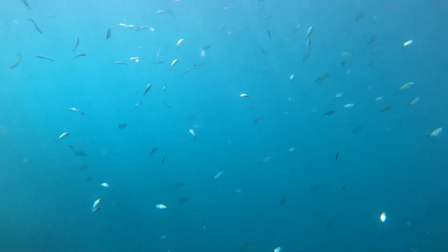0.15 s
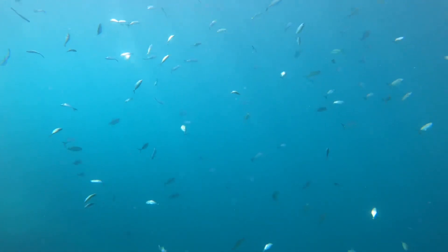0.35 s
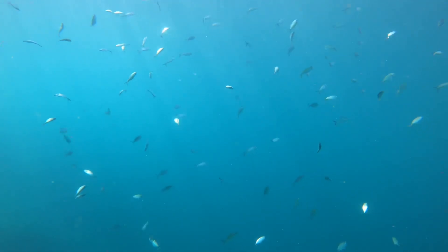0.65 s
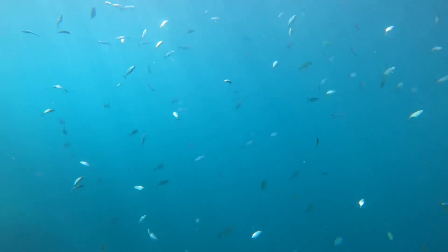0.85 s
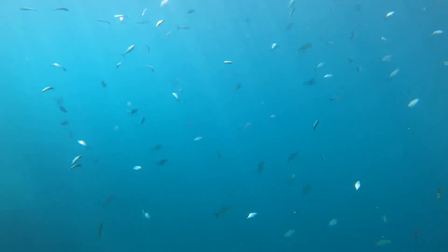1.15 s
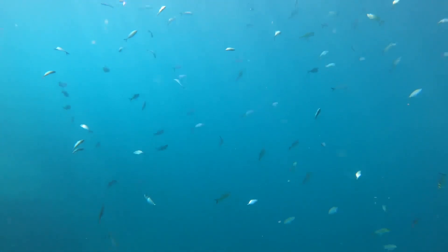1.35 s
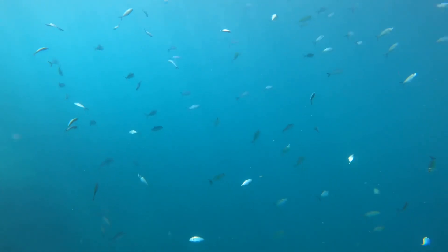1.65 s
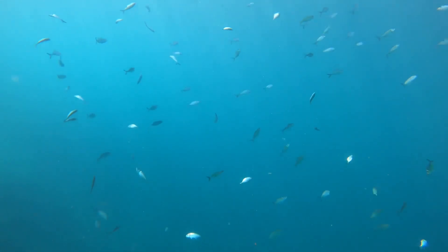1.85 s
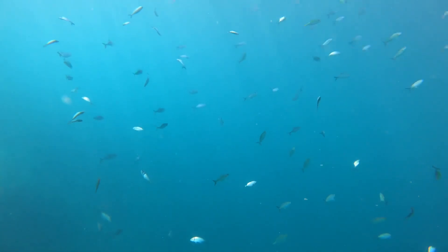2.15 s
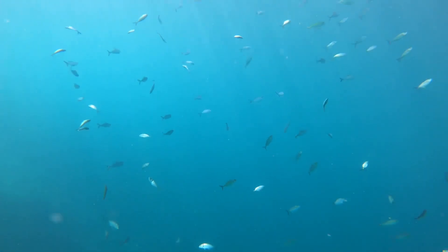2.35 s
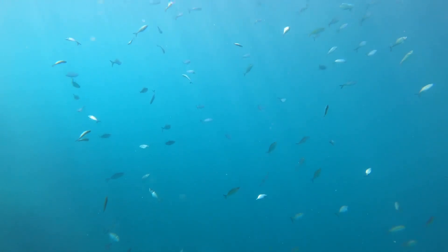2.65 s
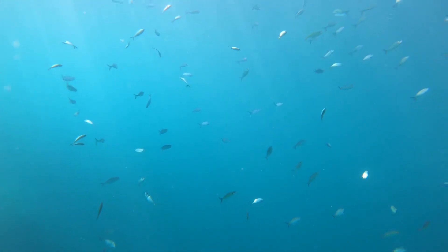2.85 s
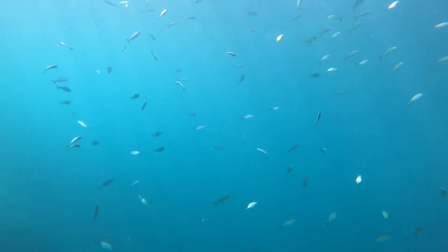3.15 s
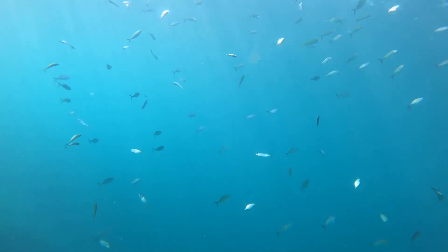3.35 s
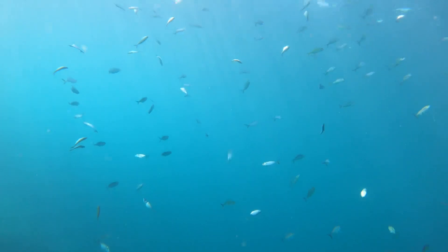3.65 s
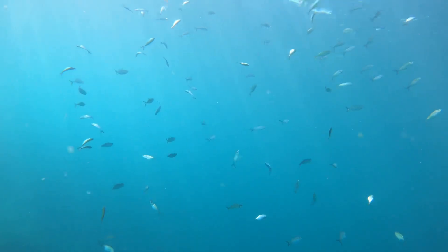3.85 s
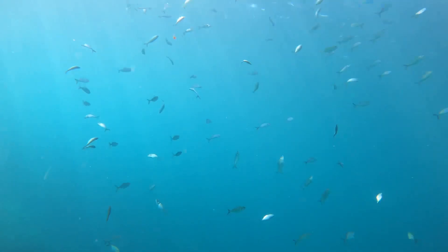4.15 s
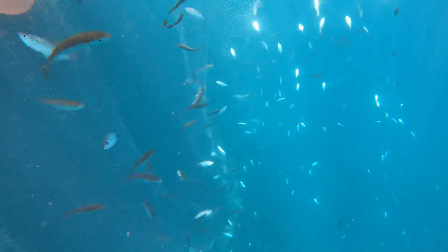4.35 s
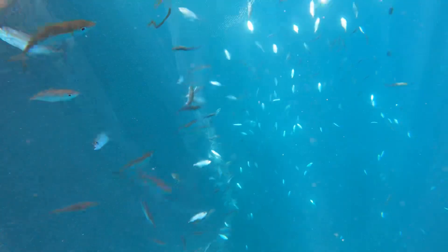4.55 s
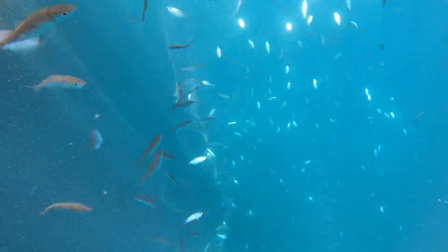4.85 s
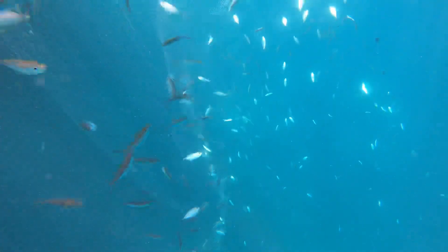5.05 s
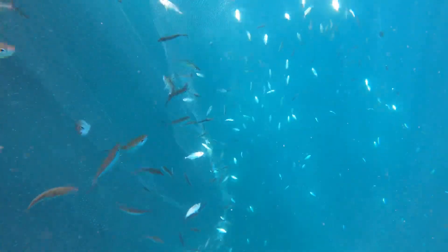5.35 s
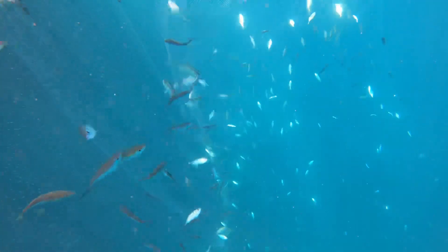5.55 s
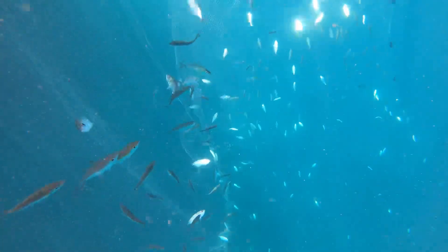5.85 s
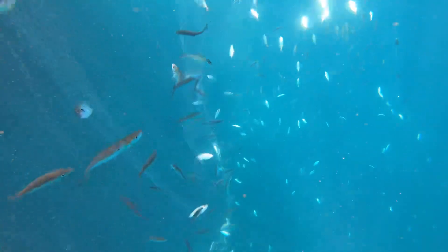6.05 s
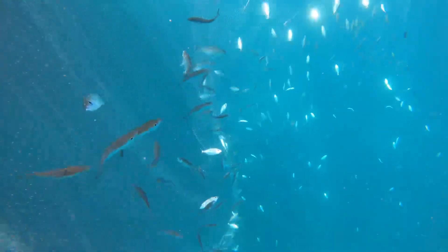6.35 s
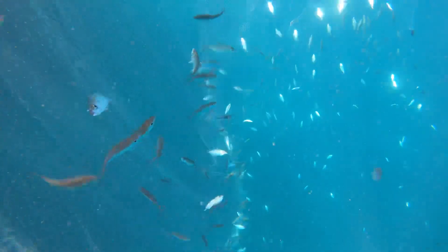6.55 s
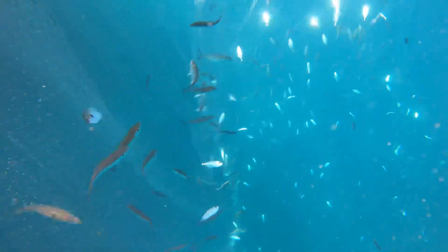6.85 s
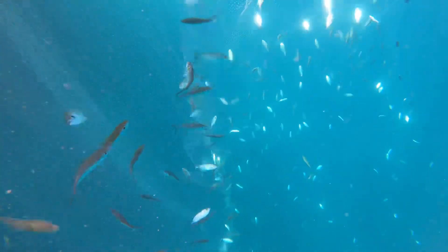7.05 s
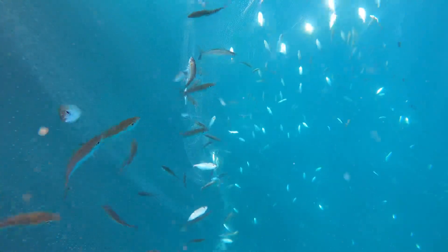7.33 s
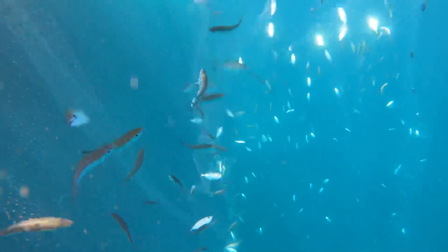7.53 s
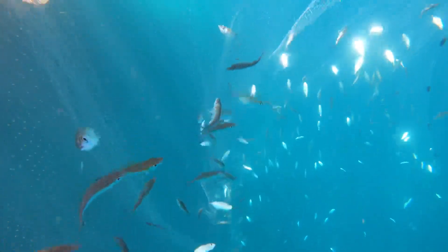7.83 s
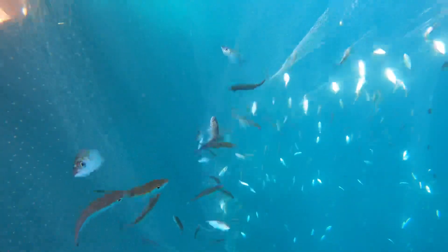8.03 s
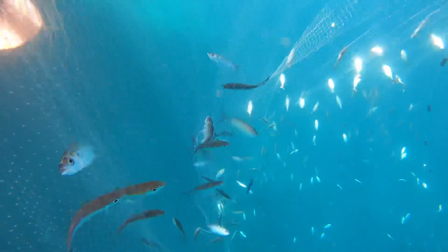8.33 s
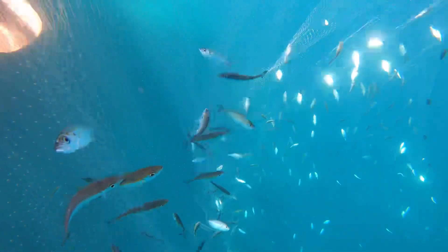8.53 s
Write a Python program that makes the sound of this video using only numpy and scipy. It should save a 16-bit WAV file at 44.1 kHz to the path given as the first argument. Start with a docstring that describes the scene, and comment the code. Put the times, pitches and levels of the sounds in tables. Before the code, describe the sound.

Heard from inside a sealed camera housing underwater, water bumps and sloshes in irregular hollow thuds over a deep rumble, a faint hiss and a boat engine's quiet hum. Sharp ticks, occasional rising bubble notes and short splashes and rubs dot the sound. After a quick dip midway, the thuds grow louder, the engine weakens, and two very faint breathy whistles waver in the hiss as the sound spreads wider.

```python
"""Moving water jostles and thuds against a sealed camera housing, which rings with its own hollow tones.
The camera drifts under water near a boat, in two shots joined by a quick fade. Behind the thuds are
a deep surge, the low hum of the engine, a faint hiss and, in the second shot, two faint whistles.
Bubbles ring as short rising notes; scrapes, splashes and dry clicks make the housing's thin shell ring.
In the second shot the camera turns, so left and right begin to sound different."""
import sys
import numpy as np
from scipy import signal
from scipy.fft import rfft, irfft
from scipy.io import wavfile
from scipy.ndimage import uniform_filter1d

SR = 44100
rng = np.random.default_rng(int(sys.argv[2]) if len(sys.argv) > 2 else 0)


def store_pcm(level_fs):
    """Save levels as 16-bit WAV."""
    pcm = np.round(np.clip(level_fs, -1, 1) * 32767).astype(np.int16)
    wavfile.write(sys.argv[1], SR, np.atleast_2d(pcm).T)


N = 383229
T = np.arange(N) / SR
CUT_S = 4.19  # where the two shots meet


def amp(db):
    """Turn decibels into a number to multiply by."""
    return 10 ** (np.asarray(db) / 20)


def unit_level(x):
    """Scale a signal so that its average strength (rms) is 1."""
    return x / np.sqrt(np.mean(x ** 2) + 1e-20)


def at_pitch(points, hz):
    """Read between the rows of a (pitch, value) table."""
    pitch, value = np.transpose(points)
    return np.interp(np.log(hz + 1), np.log(pitch + 1), value)


def add(mix, start_s, sound):
    """Mix a sound in at its start time."""
    part = mix[..., round(start_s * SR):][..., :sound.shape[-1]]
    part += sound[..., :part.shape[-1]]


def wander(per_s):
    """A smooth random curve of strength 1 that changes about per_s times a second."""
    span = int(SR / per_s)
    return unit_level(uniform_filter1d(uniform_filter1d(rng.standard_normal(N), span), span))


def resonate(x, hz, widths_hz):
    """Keep the sound near one pitch, which may move; each width filters it once more."""
    spin = np.exp(2j * np.pi * np.cumsum(hz * np.ones(len(x))) / SR)
    x = x / spin
    for width in widths_hz:
        decay = np.exp(-np.pi * width / SR)
        x = signal.lfilter([1 - decay], [1, -decay], x)
    return 2 * (x * spin).real


def narrow_noise(hz, width_hz):
    """Noise gathered around one pitch."""
    return unit_level(resonate(rng.standard_normal(N), hz, (width_hz, width_hz)))


def shaped_noise(spectrum, patchy_db, size):
    """Noise that follows a (pitch, level) table, with random louder and softer patches."""
    frames, hz = 4 * N // size + 5, np.fft.rfftfreq(size, 1 / SR)
    real, imag, patches = rng.standard_normal((frames, len(hz), 3)).T
    patches = unit_level(uniform_filter1d(uniform_filter1d(patches, 8, 0), 8, 1))
    slices = (real + 1j * imag) * amp(at_pitch(spectrum, hz)[:, None] + patchy_db * patches)
    return unit_level(signal.istft(slices, nperseg=size, noverlap=3 * size // 4)[1][:N])


def ring(tones, peak_db, tilt_db, pushes, centre_hz, scatter_db, detune=.04, lumpy_db=0, strike=0):
    """Each push, roughened by noise, rings an object's own tones; tilt_db brightens it, per octave."""
    size = 2 * pushes.shape[1]
    hz = np.fft.rfftfreq(size, 1 / SR)
    response = np.array([amp(db) * (width / (width + 1.3j * (hz - pitch))) ** 2
                         for pitch, width, db in tones])
    # each push gets its own mix of the tones
    colour = amp(scatter_db * (rng.random((len(peak_db), len(tones))) - .5)) @ abs(response)
    low_hz, top_hz = np.min(tones, 0)[0], np.max(tones, 0)[0]
    colour *= amp(tilt_db[:, None] * np.log2(np.clip(hz, low_hz, top_hz) / centre_hz))
    colour /= 1 + (hz / top_hz / 5.3) ** 4  # little rings far above the top tone
    stretch = 1 + detune * (rng.random((len(peak_db), 1)) - .5)
    shifted = np.minimum(np.arange(len(hz)) * stretch, len(hz) - 1).astype(int)
    colour = np.take_along_axis(colour, shifted, 1)
    lumps = uniform_filter1d(rng.standard_normal(colour.shape), 1 + int(600 / hz[1]), 1)  # 600 Hz wide
    colour *= amp(lumpy_db * unit_level(lumps))  # no two blows land on the same spot
    # make the tones ring after the push, not before (a minimum-phase filter)
    cepstrum = irfft(np.log(colour + 1e-9))[:, :size // 2]
    cepstrum[:, 1:] *= 2
    colour = np.exp(rfft(cepstrum, size))
    force = strike + pushes * rng.standard_normal(pushes.shape)
    out = irfft(rfft(force, size) * colour)[:, :3 * size // 4]
    out *= np.minimum(.8 * centre_hz * np.arange(out.shape[1]) / SR, 1) ** 2  # soft start
    return out * (amp(peak_db) / abs(out).max(1))[:, None]


# How far the camera has turned: (time [s], share of the whole turn [0-1])
CAMERA_TURN = [(4.3, 0), (5, 0.1), (6, 0.46), (7, 0.79), (8.69, 1)]
# How much louder the left is after the turn: (pitch [Hz], left minus right [dB])
LEFT_LOUDER = [(100, .3), (350, .8), (600, 2), (1000, 2), (2000, 1), (4000, -.5), (9000, 2.5)]
# How far the left wave runs ahead after the turn: (pitch [Hz], lead [radians])
LEFT_AHEAD = [(200, 0), (600, -.2), (1300, -.3), (2300, -1.3), (3600, -.3), (5000, -1.2)]
# Sound that comes from all round: (pitch [Hz], relative level [dB])
SCATTER = [(60, -27.5), (300, -49), (1000, -8.5), (2000, -13), (4000, 1.5), (12000, -10)]


def microphones(mono):
    """Two microphone openings hear alike until the camera turns; then level and timing differ."""
    hz = np.fft.rfftfreq(2048, 1 / SR)
    ratio = amp(at_pitch(LEFT_LOUDER, hz)) * np.exp(1j * at_pitch(LEFT_AHEAD, hz))
    scatter = amp(at_pitch(SCATTER, hz)) * np.exp(2j * np.pi * rng.random(len(hz)))
    direct, scattered = (signal.oaconvolve(mono, np.roll(irfft(response), 1024)[1:], "same")
                         for response in ((ratio - 1) / (ratio + 1), scatter))
    turned = np.interp(T, *np.transpose(CAMERA_TURN))
    side = turned * (direct + scattered * (.3 + .7 * wander(60)))
    return np.array([mono + side, mono - side])


# How hard the water moves, one list a shot: (time [s], jostle [dB], surge [dB], hiss [dB])
WATER_LEVELS = [
    [(0.06, -38, -30, -58.5), (0.3, -32, -42, -56.5), (0.52, -34, -39, -55), (0.7, -25, -28, -48.5),
     (1.2, -30.5, -39, -50), (1.6, -28.5, -36, -57), (2.1, -30.5, -31, -51), (2.4, -23, -23.5, -47),
     (2.75, -27, -30, -47.5), (3.3, -25, -27, -47.5), (3.6, -23.5, -32.5, -53), (4.13, -23.5, -30, -48.5)],
    [(4.27, -26, -40.5, -55), (4.65, -24.5, -27.5, -50.5), (5.3, -25.5, -34, -52.5), (5.8, -24.5, -31, -49),
     (6.3, -24.5, -30, -49.5), (7.0, -25, -37, -49), (7.4, -27, -38.5, -47), (7.75, -27.5, -24, -52),
     (8.1, -28, -30.5, -48), (8.5, -27, -34.5, -45), (8.69, -25, -25.5, -54.5)],
]


def water_levels():
    """The jostle, surge and hiss levels at every moment, in dB."""
    times, *columns = np.transpose(np.concatenate(WATER_LEVELS))
    return [np.interp(T, times, column) for column in columns]


# The deep sound of moving water: (pitch [Hz], relative level [dB])
SURGE_SPECTRUM = [(8.8, -25), (15, -3.5), (32, 7.5), (49, -2.5), (70, -7.5), (87, -4), (152, -13.5),
                  (260, -22), (340, -35.5), (570, -120)]


def surge(level_db, sway_db=3):
    """Moving water makes a deep rumble that swells and sinks at random."""
    return amp(level_db + sway_db * wander(10)) * shaped_noise(SURGE_SPECTRUM, 0.43, size=4096)


# The notes in the engine's hum: (multiple of the firing rate, level [dB])
ENGINE_NOTES = [(2, -45), (3, -41.5), (5, -51.5)]


def engine(firing_hz=21.18):
    """The boat's engine fires over and over, making a wavering hum that is fainter in the second shot."""
    firings = np.cumsum(firing_hz * (1 + 0.016 * wander(6.6))) / SR
    out = np.zeros(N)
    for multiple, db in ENGINE_NOTES:
        level = amp(db - 5.3 * (T > CUT_S) + 5.2 * wander(40))
        out += np.sqrt(2) * level * np.sin(2 * np.pi * (multiple * firings + rng.random()))
    return out


# The hiss heard through the shell: (pitch [Hz], relative level [dB])
HISS_SPECTRUM = [(900, -45), (1300, -13), (1520, -4.5), (1660, 9), (1830, -8.5), (2100, -14.5), (2450, -18),
                 (2950, -9), (3900, -23.5), (4800, -22.5), (5600, -47.5), (6500, -30.5), (8000, -41.5),
                 (12000, -45), (15000, -78)]


def hiss(level_db):
    """A faint flickering hiss, with an extra, steadier high band in the first shot."""
    flicker = amp(1.5 * wander(25) + 2.5 * wander(150)) * shaped_noise(HISS_SPECTRUM, 2.5, size=512)
    high_band = (T < CUT_S) * amp(-31 + 1.9 * wander(100)) * narrow_noise(5700, 970)
    return amp(level_db) * (flicker + high_band)


# Two whistles in the hiss: (time [s], upper whistle [dB], lower whistle [dB])
WHISTLE_LEVELS = [(4.201, -85.5, -80.5), (5.601, -93.5, -80), (6.498, -97, -78), (8.69, -99.5, -71)]


def whistles(pitches_hz=(6650, 5150), width_hz=700):
    """Two faint, breathy whistles waver in the second shot; the upper one gives way to the lower."""
    times, *levels = np.transpose(WHISTLE_LEVELS)
    out = np.zeros(N)
    for db, hz in zip(levels, pitches_hz):
        out += amp(np.interp(T, times, db) + 3 * wander(20) + 4 * wander(120)) * narrow_noise(hz, width_hz)
    return (T > CUT_S) * out


# Rubs on the shell: (middle time [s], level [dB], half length [s])
SCRAPES = [(0.948, -51, 0.3), (4.307, -39, 0.025), (4.559, -35, 0.017), (4.651, -32.5, 0.0081),
           (4.688, -39, 0.015), (4.734, -33, 0.011), (4.791, -40, 0.0088), (5.049, -40.5, 0.039),
           (5.17, -42.5, 0.079), (5.285, -47, 0.032), (5.8, -38, 0.02), (6.733, -40, 0.019),
           (6.763, -39.5, 0.016), (6.985, -35, 0.012)]


def scrapes():
    """Something rubs the shell and keeps one of its low tones singing for a moment."""
    swell = sum(amp(db) * np.exp(-((T - middle_s) / half_s) ** 4) for middle_s, db, half_s in SCRAPES)
    return swell * amp(1.5 * wander(60)) * narrow_noise(hz=1660, width_hz=210)


# The thin shell's own tones; wider ones die sooner: (pitch [Hz], width [Hz], relative level [dB])
SHELL_TONES = [(1080, 230, -4), (1650, 220, 13), (3064, 580, 17), (3130, 1900, -7), (4637, 1000, 8),
               (6640, 600, -2), (7000, 3000, -30), (9700, 730, -15), (13200, 1400, -28)]
# Fizzy splashes: (middle time [s], peak level [dB], brightness [dB per octave], half length [s])
SPLASHES = [(1.967, -36.5, 1, 0.014), (2.342, -36.5, 5, 0.014), (2.412, -31, 5, 0.024),
            (2.614, -26, -6, 0.014), (3.061, -32, -2, 0.013), (3.291, -36, 3, 0.041),
            (3.359, -41, -1, 0.11), (4.659, -40, -13.5, 0.036), (4.713, -26, -13, 0.046),
            (5.04, -36, -6.5, 0.037), (5.18, -50, -29, 0.1)]


def splashes():
    """Each splash is a dense crackle that swells and fades on the shell."""
    out, t = np.zeros(N), np.arange(-4096, 4096) / SR
    times, db, tilt_db, half_s = np.transpose(SPLASHES)
    crackle = amp(5 * np.minimum(rng.exponential(1, (len(times), len(t) // 64)), 4)).repeat(64, 1)
    pushes = crackle * np.exp(-(t / half_s[:, None]) ** 2)
    sounds = ring(SHELL_TONES, db, tilt_db, pushes, centre_hz=3000, scatter_db=2.9, lumpy_db=2)
    for middle_s, splash in zip(times, sounds):
        add(out, middle_s + t[0], splash)
    return out


# The louder clicks: (time [s], peak level [dB], brightness [dB per octave])
CLICKS = [(0.129, -40, -7), (0.3113, -22.5, -15), (0.147, -46.5, -14), (0.173, -51.5, 2.5),
          (0.2803, -47, -14), (0.3576, -46, 10), (0.4519, -55, 0), (0.589, -39, -9), (0.612, -33, -11),
          (0.657, -34, -10), (0.694, -48, -7), (0.705, -45, 3), (0.807, -34, -13), (0.8774, -55, -11),
          (0.9184, -45, -14), (0.93, -29.5, -9), (1.068, -30, -4), (1.2054, -32, -16), (1.309, -43.5, 4),
          (1.42, -46, 8.5), (1.8368, -43, -5), (1.938, -38, -17), (1.959, -41, -12), (2.197, -43, 2),
          (2.281, -52, 25), (2.2857, -40, -4), (2.3137, -44, -5), (2.336, -29, -11), (2.3835, -45, -2),
          (2.4025, -39, 1), (2.423, -30, -5), (2.4534, -47, 1), (2.4833, -34, -5), (2.5217, -46, -8),
          (2.537, -51, 1), (2.558, -51, 12), (2.585, -44, 0), (2.6025, -22, -18), (2.611, -21, -23),
          (2.8141, -28, -1), (2.839, -42, -1), (2.9, -32.5, 2), (2.9747, -45, 0), (3.053, -28, -9.5),
          (3.064, -29, -7), (3.115, -40.5, 2), (3.1493, -35, 0.5), (3.2291, -50, -6), (3.264, -35.5, 0),
          (3.2915, -33, -11), (3.34, -34.5, -1), (3.364, -28, -9), (3.425, -36, -2), (3.468, -37, -23),
          (3.528, -38, -0.5), (3.66, -39.5, 2.5), (3.705, -44.5, 2), (3.775, -45, 9), (3.8362, -38.5, -9),
          (3.8505, -31, -6), (4.0123, -38, -9), (4.0616, -35, -3), (4.0931, -39, -3), (4.127, -34.5, -5.5),
          (4.26, -29.5, -15), (4.313, -48, 3), (4.4, -39, -4.5), (4.4643, -37, -10), (4.53, -37, 6),
          (4.604, -40, -3), (4.6354, -37, -9), (4.6548, -35, -6), (4.69, -29, -19), (4.6981, -26, -8),
          (4.7337, -33, -10), (4.7686, -43.5, -20), (4.79, -26, -17.5), (4.8377, -44, -12),
          (4.8838, -34, -9.5), (4.962, -40, -5), (5.007, -35, -10.5), (5.043, -42, 4), (5.122, -25, -18.5),
          (5.235, -36, -9), (5.319, -44, 7), (5.5658, -20, 2), (5.581, -38, 6), (5.704, -20.5, 4.5),
          (5.609, -45, 4), (5.7694, -36, -1), (5.7914, -30, 3), (5.8703, -30.5, -11), (5.975, -44, 4),
          (6.019, -34.5, 1), (6.083, -26.5, -10), (6.186, -27, -19), (6.295, -40, -6), (6.349, -15.5, -6.5),
          (6.4473, -27, -16), (6.585, -39, -9), (6.5976, -28, -16), (6.632, -31.5, -1.5),
          (6.7456, -39.5, 3.5), (6.8664, -25.5, -16), (6.89, -39, 3), (6.914, -42, 6), (7.02, -44, -2),
          (7.0635, -37, -10), (7.1811, -42, -4), (7.1932, -29.5, 1), (7.2887, -30, -10.5),
          (7.373, -27.5, -7), (7.3886, -33, -5.5), (7.4545, -41, -13), (7.481, -27.5, -18),
          (7.5917, -41, -15), (7.671, -46, 1), (7.693, -22.5, -4.5), (7.7578, -35, -2.5), (7.832, -43, -5),
          (7.891, -20.5, -6), (8.0756, -38, -2), (8.2013, -35, 1), (8.2422, -41, -11), (8.432, -15, -11.5),
          (8.5011, -40, -14), (8.5245, -38, 2), (8.596, -35.5, -2), (8.6063, -38, 0)]


def clicks(hiss_db, tries_per_s=450, tail_s=0.005, tail_db=-17):
    """Sharp ticks with a crackly tail ring the shell; faint random ones crowd where the hiss is strong."""
    when, size, bright, chance = rng.random((int(tries_per_s * N / SR), 4)).T
    faint = np.c_[when * N / SR, -61 - 6 * np.log(size + .02), 12 * (bright - .9)]
    faint = faint[chance < amp(hiss_db[(when * N).astype(int)] + 36)]
    out, t = np.zeros(N), np.arange(1536) / SR
    snap = np.exp(-((t - .0021) / .0011) ** 2)
    tail = amp(tail_db) * t / tail_s * np.exp(-t / tail_s)
    grit = .25 * np.exp(-((t - .003) / .002) ** 2)  # makes some ticks softer and longer
    for times, db, tilt_db in np.transpose(CLICKS), faint.T:
        pushes = snap + tail + rng.random((len(times), 1)) * grit
        ticks = ring(SHELL_TONES, db, tilt_db, pushes, 3000, scatter_db=12, detune=.06, lumpy_db=2.5)
        for start_s, tick in zip(times, ticks):
            add(out, max(start_s - .0008, 0), tick)
    return out


# The bubbles that stand out: (time [s], level [dB], starting pitch [Hz])
BUBBLES = [(0.127, -5.5, 351), (3.469, -27.5, 2430), (4.689, -23, 3140), (4.7, 0.5, 358),
           (4.916, -26, 2960), (5.085, 1, 273), (5.118, -0.5, 240.5), (6.494, -12, 323), (6.867, -25, 3070),
           (7.288, -27, 2800), (7.254, -32, 2700), (7.56, -31, 3000), (7.589, -28, 2570),
           (7.759, -28.5, 3150), (7.769, -29, 363), (8.074, -29.5, 2580), (8.617, -6, 363)]


def bubbles(hiss_db, tiny_per_s=60, low_hz=2500, top_hz=5200):
    """A bubble swells fast and rings, rising a little in pitch; tiny ones pop at random in the hiss."""
    out = np.zeros(N)
    when, quiet, pitch = rng.random((int(tiny_per_s * N / SR), 3)).T
    tiny_db = hiss_db[(when * N).astype(int)] + 1.5 - 10.5 * quiet
    tiny = np.c_[when * N / SR, tiny_db, low_hz * (top_hz / low_hz) ** pitch ** 3]
    for rows, ring_at_1khz_s in (BUBBLES, .032), (tiny, .016):
        for start_s, db, hz in rows:
            ring_s = ring_at_1khz_s * (hz / 1e3) ** -0.7  # higher bubbles die sooner
            t = np.arange(0, 1.5 * ring_s, 1 / SR)
            swell = (1 - np.exp(-t / (0.099 * ring_s))) * amp(db - 60 * t / max(ring_s, .004))
            add(out, start_s, swell * np.sin(2 * np.pi * hz * t * (1 + 0.46 * t)))
    return out


# The tones of a hard knock: (pitch [Hz], level [dB], time to fade by 60 dB [s])
KNOCK_TONES = [(128, -9, 0.12), (360, -9, 0.045), (650, -7.5, 0.041), (965, -5, 0.026),
               (1525, -15.5, 0.048), (1704, 3.5, 0.012), (2680, -3, 0.0071), (3570, 0.5, 0.0051)]


def knock(start_s=.0155, rise_s=.0007):
    """One hard knock on the housing sets off tones that quickly die away."""
    out, t = np.zeros(N), np.arange(SR // 5) / SR
    tones = sum(amp(db - 60 * t / ring_s) * np.sin(2 * np.pi * hz * t) for hz, db, ring_s in KNOCK_TONES)
    add(out, start_s, (1 - np.exp(-t / rise_s)) ** 2 * tones)
    return out


# The housing's own tones, one list a shot: (pitch [Hz], width [Hz], relative level [dB])
HOUSING_TONES = [
    [(394, 41, 6.5), (577.4, 68, 10), (607, 14, -4.5), (681, 51, -6), (995, 51, -3.5), (1620, 650, -30),
     (289, 2.3, -22.5)],
    [(368.4, 48.6, 2.5), (553, 79.7, -2.5), (311, 52, -12), (710, 23, -17), (940.5, 23.3, -13.5),
     (1640, 147, -29), (168.7, 9.3, -16)],
]


def jostle(level_db, pushes_per_s=1500, soften_hz=2400):
    """Many small, soft, uneven pushes of water keep the housing ringing."""
    tilt_db = -wander(3.2) - 0.86  # the brightness drifts, in dB per octave
    sizes = amp(2 * np.minimum(rng.exponential(1, N), 5)) * (rng.random(N) < pushes_per_s / SR)
    pushes = sizes * rng.choice([-1., 1.], N) * amp(1.6 * wander(48))
    pushes = signal.sosfilt(signal.butter(4, soften_hz, fs=SR, output="sos"), pushes)
    pitch_drift = 1 + .012 * wander(12)
    out = np.zeros(N)
    for tones, shot in zip(HOUSING_TONES, (T < CUT_S, T >= CUT_S)):
        for hz, width, db in tones:
            level = amp(db + tilt_db[shot] * np.log2(hz / 480))
            out[shot] += level * resonate(pushes[shot], hz * pitch_drift[shot], (width, 3.95 * width))
        out[shot] = unit_level(out[shot])
    return amp(level_db) * out


# The loud thuds: (time [s], peak level [dB], brightness [dB per octave])
THUDS = [(0.122, -17.5, 4), (0.62, -16, 0), (0.775, -19, -6), (1.133, -16, 0.5), (1.316, -11.5, -6.5),
         (1.39, -20, 5.5), (1.45, -22, -3), (1.482, -13.5, -1), (1.652, -10.5, -2.5), (1.865, -11.5, -2),
         (2.037, -11.5, -6), (2.238, -12.5, -2), (2.317, -13.5, -13), (2.384, -19, 7), (2.435, -11.5, -6),
         (2.626, -13.5, -1), (2.652, -25.5, -7), (2.923, -15.5, 0), (2.96, -16, -2.5), (3.308, -16.5, 8.5),
         (3.372, -13, 5.5), (3.481, -15.5, -8.5), (3.545, -18.5, 4.5), (3.643, -14.5, -4), (3.668, -20, -2),
         (3.753, -15, 0), (3.961, -11.5, -7.5), (4.306, -7.5, 7.5), (4.366, -6.5, 1), (4.401, -12.5, -3.5),
         (4.533, -14, 10.5), (4.561, -7.5, 2.5), (4.713, -15, 4), (4.769, -7.5, -2), (4.837, -8.5, -5.5),
         (4.99, -14, -4), (5.052, -8.5, -7), (5.361, -13, 2.5), (5.474, -16, 5), (5.516, -7.5, 3),
         (5.55, -12, -5), (5.69, -11, 2.5), (5.777, -14.5, -9.5), (5.864, -9.5, 3), (5.899, -12, -4.5),
         (5.917, -10, -0.5), (5.982, -18, 0.5), (6.082, -18.5, 6.5), (6.135, -7, 0), (6.203, -10, 1.5),
         (6.23, -11.5, -1.5), (6.334, -13, -2), (6.42, -10.5, 1), (6.497, -10, -7), (6.703, -8, 6.5),
         (6.76, -6, -0.5), (6.972, -8.5, 1), (7.08, -13.5, -4), (7.21, -16.5, -4), (7.32, -7.5, 4),
         (7.364, -13, -5), (7.445, -12, -4), (7.494, -10.5, 3.5), (7.64, -14.5, -3.5), (7.772, -8, 6.5),
         (7.8, -6.5, -5.5), (8.12, -11.5, 5.5), (8.274, -10.5, -5.5), (8.316, -12.5, 3), (8.428, -10.5, 4),
         (8.521, -13, -2), (8.545, -7, 1)]


def thuds(jostle_db, faint_per_s=2, rise_s=.0015, push_s=.035, lead_s=.003025, strike_s=.00015):
    """Strong single pushes of water ring the housing; fainter random ones follow the jostle's level."""
    out, t = np.zeros(N), np.arange(2560) / SR
    when, quiet, bright = rng.random((int(faint_per_s * N / SR), 3)).T
    faint_db = jostle_db[(when * N).astype(int)] + 2 - 6 * quiet
    faint = np.c_[.1 + when * (N / SR - .1), faint_db, 12 * (bright - .6)]
    rows = np.r_[THUDS, faint]
    strike = -amp(7) * np.exp(-((t - lead_s - strike_s) / strike_s) ** 2)  # the hard front of a push
    for tones, shot in zip(HOUSING_TONES, (rows[:, 0] < CUT_S, rows[:, 0] > CUT_S)):
        times, db, tilt_db = rows[shot].T
        length_s = push_s * (1 + .3 * (rng.random((len(times), 1)) - .5))
        pushes = (1 - np.exp(-t / rise_s)) ** 2 * np.exp(-(t / length_s) ** 2)
        struck = [(hz, width, tone_db - 2 * (hz > 850)) for hz, width, tone_db in tones]  # softer highs
        sounds = ring(struck, db, tilt_db, pushes, centre_hz=480, scatter_db=4, strike=strike)
        for start_s, thud in zip(times, sounds):
            add(out, start_s - lead_s, thud)
    return out


def scene():
    """Add up all the sounds and hear them through the two microphones."""
    jostle_db, surge_db, hiss_db = water_levels()
    background = surge(surge_db) + hiss(hiss_db)
    housing = jostle(jostle_db) + thuds(jostle_db) + knock()
    shell = whistles() + scrapes() + splashes() + clicks(hiss_db)
    return microphones(background + engine() + shell + bubbles(hiss_db) + housing)


def record(dry, fade_out_s=.061, fade_in_s=.066, top_hz=15100):
    """Fade out and back in where the shots meet, then cut off the highest treble."""
    fade = np.clip(np.maximum((CUT_S - T) / fade_out_s, (T - CUT_S) / fade_in_s), 0, 1) ** 1.16
    low_pass = signal.firwin(511, top_hz, window=("kaiser", 9), fs=SR)
    return signal.oaconvolve(dry * fade, low_pass[None], "same")


dry = scene()
out = record(dry)
store_pcm(out)
```